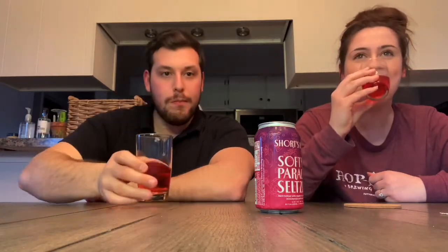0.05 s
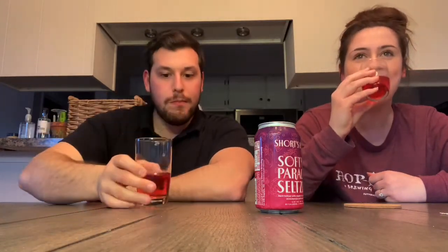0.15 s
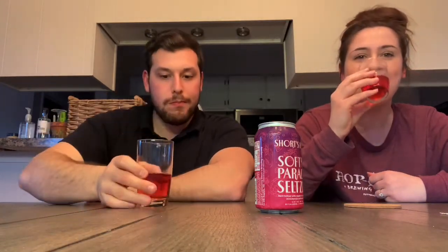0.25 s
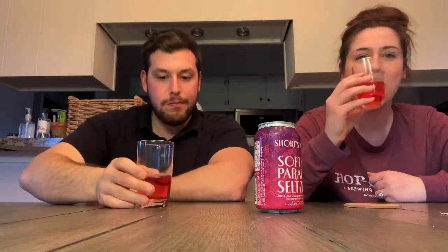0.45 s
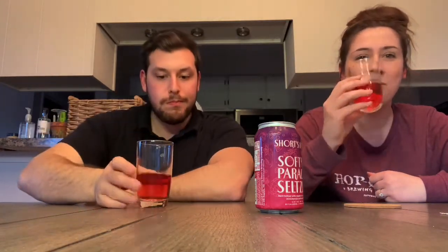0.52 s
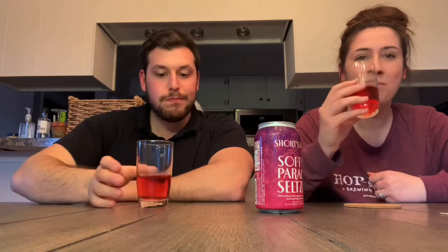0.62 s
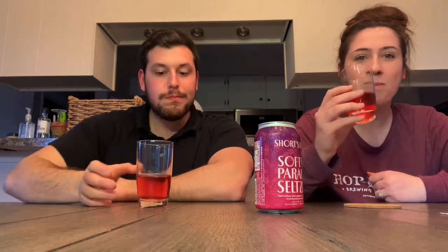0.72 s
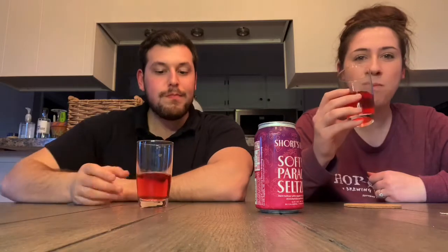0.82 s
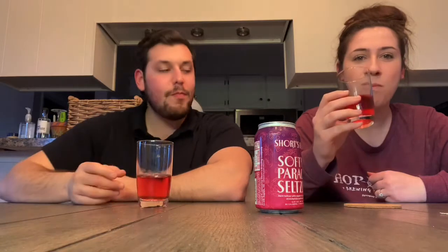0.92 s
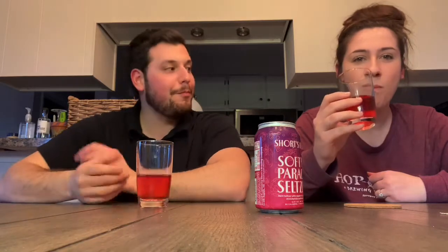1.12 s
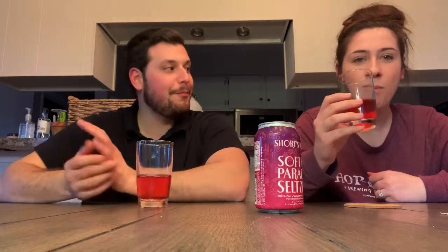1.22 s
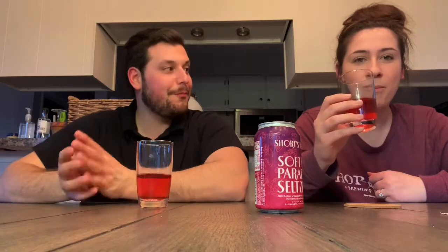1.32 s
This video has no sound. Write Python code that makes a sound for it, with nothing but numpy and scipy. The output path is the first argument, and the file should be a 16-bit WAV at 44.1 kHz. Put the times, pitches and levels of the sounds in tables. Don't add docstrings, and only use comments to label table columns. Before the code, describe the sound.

Glass set down hard on a wooden tabletop, hollow ringing thump, then faint arm rubbing and knocks

```python
import sys
import numpy as np
from scipy import signal
from scipy.fft import rfft, irfft, next_fast_len
from scipy.io import wavfile
from scipy.ndimage import uniform_filter1d, minimum_filter1d, map_coordinates

SR = 44100
rng = np.random.default_rng(int(sys.argv[2]) if len(sys.argv) > 2 else 0)


def amplitude_ratio(level_db):
    exponent = np.asarray(level_db, float) / 20
    return 10 ** exponent


def waveform_to_disk(signal):
    frames = np.transpose(np.atleast_2d(signal))
    scaled = np.clip(frames, -1, 1) * 32767
    samples = np.round(scaled).astype(np.int16)
    wavfile.write(sys.argv[1], SR, samples)


N = 59535
TIME = np.arange(N) / SR
CRACK_S = .2258


def unit(x):
    return x / np.sqrt(np.mean(x ** 2) + 1e-20)


def along(points, hz):
    f, v = np.transpose(points)
    return np.interp(np.log(hz + 1), np.log(f + 1), v)


def filtered(x, response):
    m = next_fast_len(N + SR // 2)
    spectrum = rfft(x, m) * response(np.fft.rfftfreq(m, 1 / SR))
    return irfft(spectrum, m)[..., :N]


def wobble(rate):
    knots = rng.standard_normal(int(N * rate / SR) + 4)
    return map_coordinates(knots, [TIME * rate])


def dying(start_s, t60, rise_s):
    t = np.maximum(TIME - start_s, 0)
    return amplitude_ratio(-60 * t / t60) * (1 - np.exp(-t / rise_s))


# pitch_hz, likeness (0 to 1)
LIKENESS = [(60, 1), (300, 0.35), (700, 0.074), (2000, 0.032), (4000, 0.1), (6000, 0.32), (7500, .95),
            (10000, 0.9)]
# pitch_hz, lead_rad
LEFT_LEAD = [(0, 0), (5500, .8), (7100, 0), (8100, 0), (9500, -3.1), (10900, -3.2), (12300, -6.2),
             (14000, -6.4), (14800, -9.3)]


def hiss(spectrum):
    def microphones(hz):
        turn = np.arccos(np.clip(along(LIKENESS, hz), 0, 1)) / 2
        lead = np.exp(.5j * np.interp(hz, *np.transpose(LEFT_LEAD)))
        left = [np.cos(turn) * lead, np.sin(turn) * lead]
        right = [np.cos(turn) / lead, -np.sin(turn) / lead]
        return amplitude_ratio(along(spectrum, hz)) * np.array([left, right])
    return unit(filtered(rng.standard_normal((2, N)), microphones).sum(axis=1))


# pitch_hz, level_db (per Hz)
ROOM = [(20, -24), (60, -1), (150, -8), (250, -1.5), (450, -12), (1350, -20.5), (1600, -38), (14500, -51)]


def kitchen_hum():
    level_db = -55.5 + 1.0 * wobble(2.8) + 2.0 * wobble(30)
    return amplitude_ratio(level_db) * hiss(ROOM)


# start_s, level_db, pitch_hz, t60_s
KNOCKS = [
    (.142, -73, 3670, 0.015),
    (.177, -69, 2500, 0.025),
    (.421, -64, 8500, .03),
    (.6645, -43, 506, 0.055),
    (.667, -49.5, 103, 0.22),
    (.672, -40, 205, 0.071),
    (.666, -45.5, 720, 0.066),
    (.912, -56.5, 2240, 0.088),
    (1.027, -67, 3380, 0.054),
    (1.045, -43, 1190, 0.015),
]


def knocks():
    taps = 0
    for start_s, level_db, hz, t60 in KNOCKS:
        ring = np.sin(2 * np.pi * hz * (TIME - start_s))
        taps = taps + amplitude_ratio(level_db) * dying(start_s, t60, 0.36 / hz) * ring
    return taps * amplitude_ratio([[1], [-1]])


AIR_HZ = [650, 1620]


def first_touch():
    start_s = .218
    tones = sum(np.sin(2 * np.pi * hz * (TIME - start_s)) for hz in AIR_HZ)
    return amplitude_ratio(-34) * tones * dying(start_s, .05, 0.0087)


# length (over direct), left_db, right_db
PATHS = [(1, 3, -6), (1.7, -19.5, -17.5), (2.6, -13.5, -21), (3.4, -14.5, -15.5), (4.5, -27, -23.5)]
# pitch_hz, level_db (per Hz)
BLOW = [(30, -54), (160, -13.5), (330, -10), (520, -3.5), (1200, -10), (1600, -22), (3300, -45),
        (3900, -69), (12000, -95)]
# pitch_hz, level_db
RIGHT_TILT = [(100, 15), (300, 4.5), (900, -3.5), (2500, 9)]


def bending():
    contact_s, blow_db = .2226, 33
    spread_cycles, travel_s = 2.4, .003
    body_hz, body_width_hz, body_db = 503, 88, 0.5

    def wave(hz):
        cycles = spread_cycles * np.log(1 + hz / 20) + travel_s * hz
        width = 1j * hz * body_width_hz
        body = 1 + amplitude_ratio(body_db) * width / (body_hz ** 2 - hz ** 2 + width)
        paths = 0
        for k, (length, left_db, right_db) in enumerate(PATHS):
            delay = np.exp(-2j * np.pi * length * cycles)
            paths = paths + (-1) ** k * amplitude_ratio([[left_db], [right_db]]) * delay
        force = amplitude_ratio(along(BLOW, hz) + [0 * hz, along(RIGHT_TILT, hz)])
        return force * paths * body * np.exp(-2j * np.pi * hz * contact_s)

    click = np.arange(N) == 0
    return amplitude_ratio(blow_db) * filtered(click, wave)


# pitch_hz, level_db (per Hz)
CRACK = [(1200, -31), (2000, 3), (3500, -14.5), (6000, -25), (9000, -34.5), (13000, -44)]


def crack():
    return amplitude_ratio(-32) * hiss(CRACK) * dying(CRACK_S, 0.021, 0.00061)


TOP_HZ = [55.9, 128.5, 191, 491, 281, 318, 354, 421, 459, 531, 626, 729, 811, 1071]
# level_db, t60_s
TOP = [(-12, 0.7), (-8.5, 0.46), (-5.5, 0.54), (-7, .3), (3.5, 0.27), (-9, .4), (-7, .42), (-3.5, 0.43),
       (-3.5, 0.4), (-1.5, 0.39), (-2.5, .33), (-0.5, 0.33), (-2, 0.26), (-10, .33)]


def top_modes():
    modes = 0
    for hz, (level_db, t60) in zip(TOP_HZ, TOP):
        phase, skew, share = rng.random(3)
        right_db = -5.5 + 6 * (share - .5)
        level = amplitude_ratio(level_db - 17.5 + np.array([[0], [right_db]]))
        turns = np.array([[phase], [phase + hz / 900 * (skew - .5)]])
        rise_s = 0.0035 * 400 / hz
        modes = modes + level * dying(CRACK_S, t60, rise_s) * np.sin(2 * np.pi * (hz * TIME + turns))
    return modes


# pitch_hz, level_db (per Hz)
TAIL = [(30, -38.5), (90, -9), (160, -17), (290, -8.5), (620, -7), (1000, -15.5), (2400, -38), (9000, -74),
        (12000, -110)]
# pitch_hz, t60_s
TAIL_T60 = [(60, .45), (200, .5), (500, .4), (1000, .38), (2000, .42), (4000, .33), (9000, .2)]
# pitch_hz, level_db
TAIL_SIDE = [(40, -6), (150, -4.5), (600, -2), (3000, 1)]


def tail():
    def colour(hz):
        return amplitude_ratio(along(TAIL, hz) + [0 * hz, along(TAIL_SIDE, hz)])
    shared, differing = filtered(rng.standard_normal((2, N)), colour)
    noise = unit(np.array([shared + differing, shared - differing]))
    hz, t, z = signal.stft(noise, SR, nperseg=512)
    fade = amplitude_ratio(-60 * np.maximum(t - CRACK_S, 0) / along(TAIL_T60, hz)[:, None])
    faded = signal.istft(z * fade, SR, nperseg=512)[1][:, :N]
    return amplitude_ratio([[-19], [-18.5]]) * faded * dying(CRACK_S, 99, 0.0027)


# start_s, level_db
STROKES = [
    [(.39, -73), (.43, -67), (.5, -64.5), (.63, -60), (.77, -59.5), (.83, -63), (.888, -72)],
    [(.896, -62.5), (.91, -59.5), (.97, -56), (1.05, -59.5), (1.14, -64), (1.18, -75)],
    [(1.19, -77), (1.22, -75.5), (1.27, -82), (1.35, -91.5)],
]
# pitch_hz, level_db (per Hz)
SKIN = [(150, -31), (400, 0.5), (1500, -8), (2300, -4), (3500, -16.5), (4200, -12.5), (5500, -19.5),
        (8000, -18.5)]
# pitch_hz, level_db (per Hz)
PALM = [(150, -29), (400, -2), (1200, -2.5), (1900, -5.5), (2400, -5.5), (3200, -12.5), (5200, -15),
        (7500, -11.5)]
# pitch_hz, level_db (per Hz)
CUFF = [(1500, -48.5), (3000, -22), (6000, -9.5), (8000, 8.5)]
# pitch_hz, level_db (over their top end)
SHEEN = [(9500, -3), (11500, -4), (13500, -15.5), (14700, -16), (15500, -52.5)]


def sliding():
    out = 0
    for stroke, colour, stroke_db in zip(STROKES, (SKIN, PALM, CUFF), (7.5, 1.5, 1)):
        spectrum = colour + [(hz, colour[-1][1] + over_db) for hz, over_db in SHEEN]
        s, level_db = np.transpose(stroke)
        times = [s[0] - .04, *s, s[-1] + 0.064]
        press_db = np.interp(TIME, times, [-130, *level_db, -130])
        grain_db = 0.13 * wobble(40) + 1.5 * wobble(160)
        out = out + amplitude_ratio(stroke_db + press_db + grain_db) * hiss(spectrum)
    return out


# pitch_hz, level_db (per Hz)
CATCH = [(6000, -34), (9000, -9.5), (10500, -0.5), (12300, 0), (13500, -5.5), (14500, -8), (15500, -15)]


def palm_catch():
    return amplitude_ratio(-51) * hiss(CATCH) * dying(.8985, .085, 0.001)


def scene():
    hum = kitchen_hum()
    glass = bending() + top_modes() + tail() + first_touch() + crack()
    arm = palm_catch() + sliding()
    return hum + knocks() + glass + arm


def top_cut(x):
    return signal.sosfilt(signal.butter(12, 14740, fs=SR, output="sos"), x)


def record(dry):
    ceiling, hold_s = .9, .006
    span = round(hold_s * SR)
    need = np.minimum(1, ceiling / (np.abs(dry).max(axis=0) + 1e-9))
    gain = uniform_filter1d(minimum_filter1d(need, size=span), size=span // 2)
    return top_cut(dry * gain)


dry = scene()
out = record(dry)
waveform_to_disk(out)
```